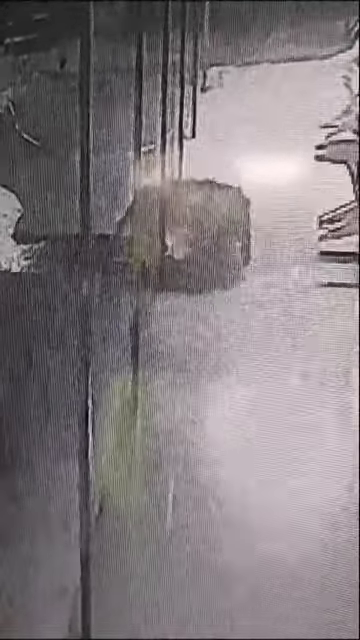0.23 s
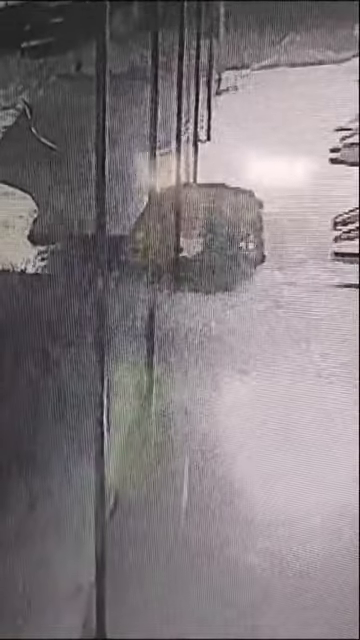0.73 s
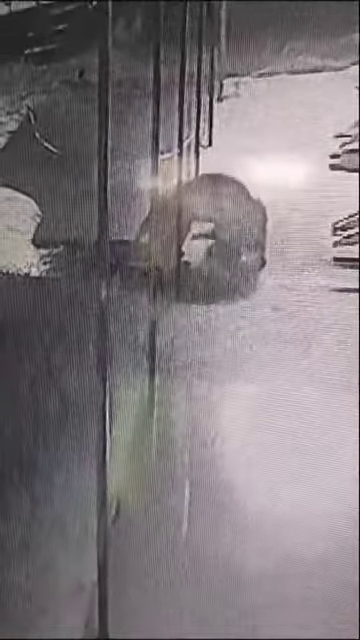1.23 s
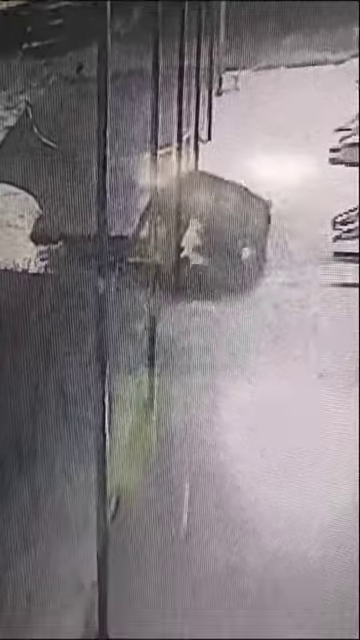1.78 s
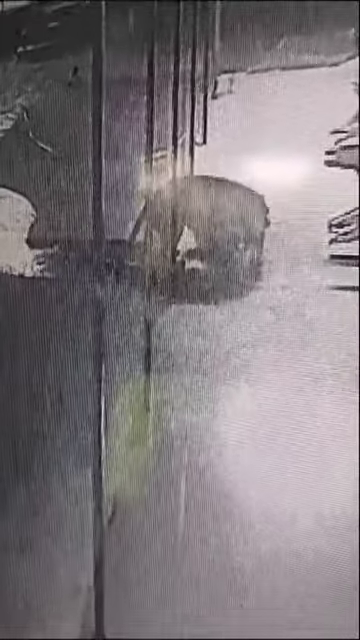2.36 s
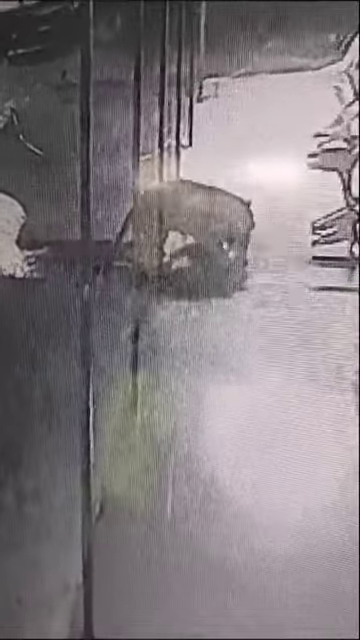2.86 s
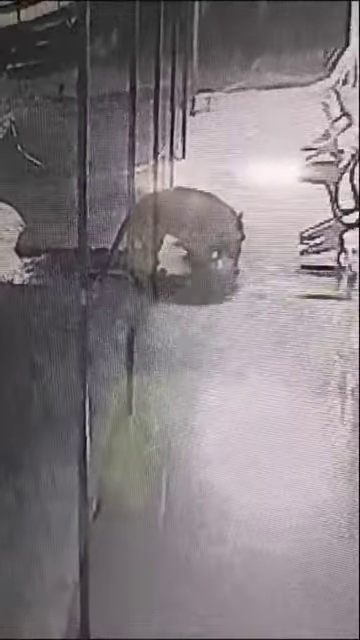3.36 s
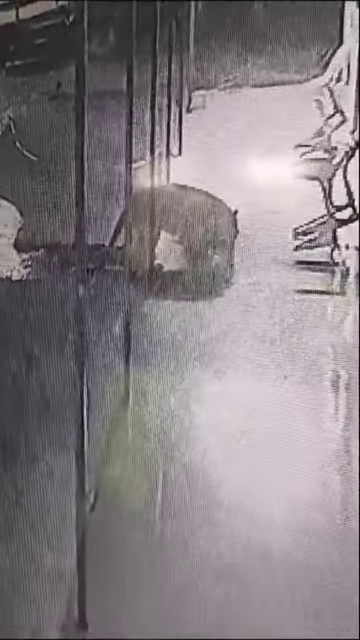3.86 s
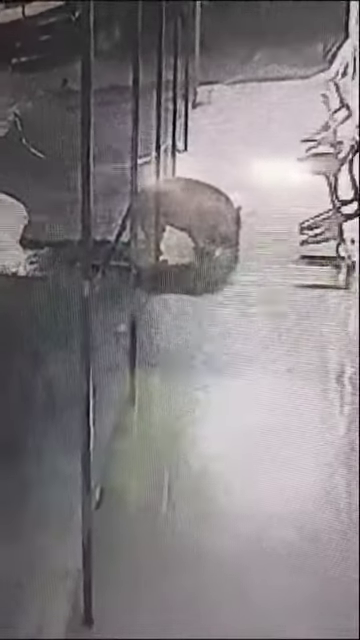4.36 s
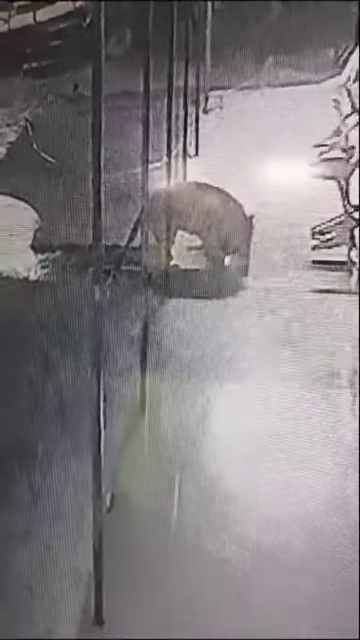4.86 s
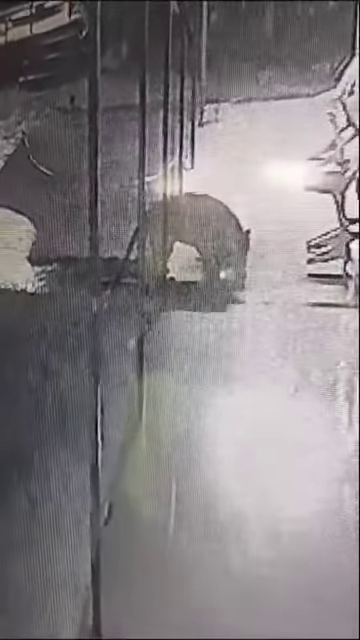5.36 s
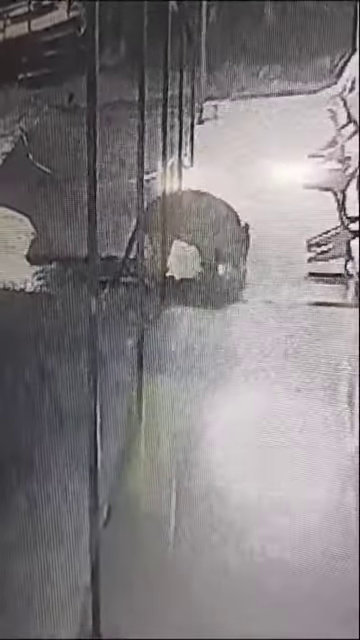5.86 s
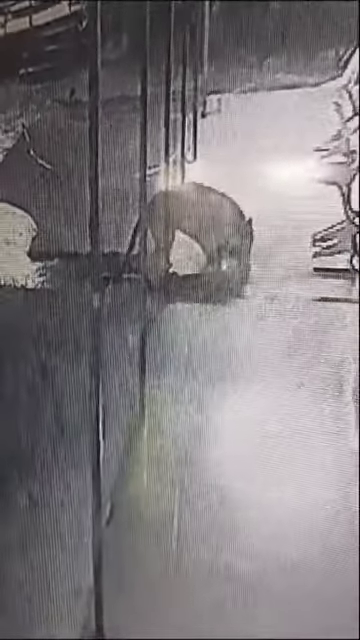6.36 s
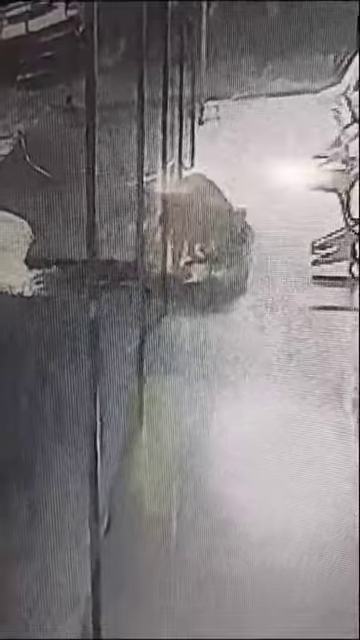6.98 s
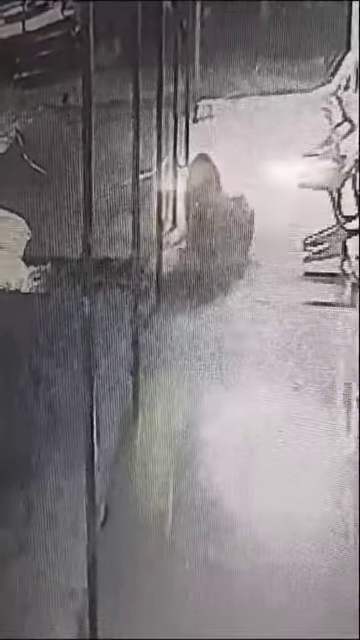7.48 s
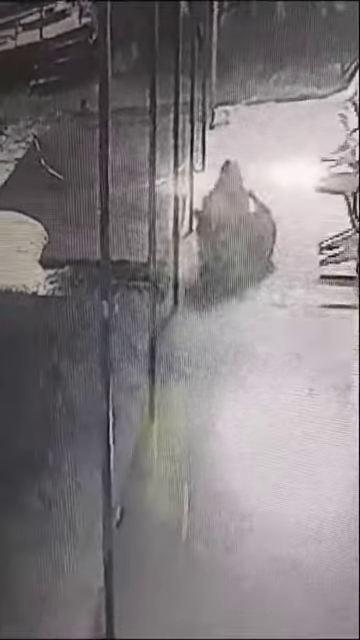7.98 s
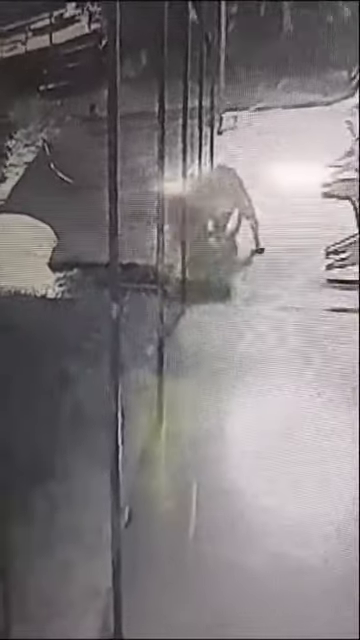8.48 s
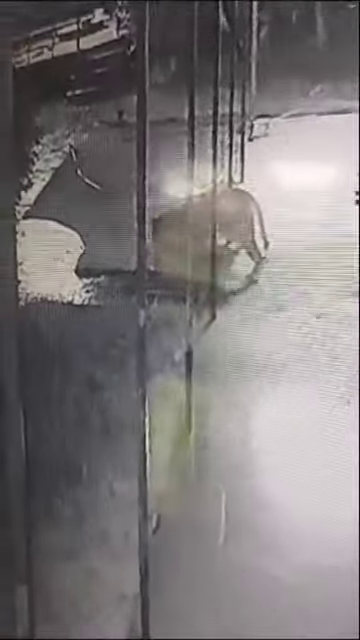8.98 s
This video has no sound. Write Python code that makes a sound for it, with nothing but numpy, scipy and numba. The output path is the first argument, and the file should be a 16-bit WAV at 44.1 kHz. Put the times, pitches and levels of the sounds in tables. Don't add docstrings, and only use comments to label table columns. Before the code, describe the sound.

Night scenes joined by quick fades. First a large cat's wet snarls and short heavy rumble, full and near. Next a leopard's rasping in-and-out breathing, like sawing wood, slowing into a low pulsing growl, with tiny bird whistles behind. Last, dull narrow-band hum and hiss with a dog giving two sharp yelps, the first squeal falling, the second rising, both distorted, with a short wall echo.

```python
import sys
import numpy as np
from scipy import signal
from scipy.fft import rfft, irfft
from scipy.io import wavfile
from scipy.ndimage import uniform_filter1d
from numba import njit

SR = 44100
rng = np.random.default_rng(int(sys.argv[2]) if len(sys.argv) > 2 else 0)


def boost(x):
    u = np.asarray(x, float) / 20
    return 10 ** u


def pcm_store(signal):
    levels = np.round(np.clip(np.atleast_2d(signal), -1, 1) * 32767)
    wavfile.write(sys.argv[1], SR, levels.astype(np.int16).T)


N = 407043
T = np.arange(N) / SR


def unit(x):
    return x / np.sqrt(np.mean(x ** 2))


def noise():
    return rng.standard_normal(N)


def curves(*tables):
    rows = np.vstack(tables)
    gate = sum((T >= t[0][0]) & (T < t[-1][0]) for t in tables) > 0
    columns = [np.interp(T, rows[:, 0], column) for column in rows.T[1:]]
    return uniform_filter1d(1. * gate, size=150), columns


@njit
def svf(x, hz, width_hz):
    y, band, low = np.empty(len(x)), 0., 0.
    for i in range(len(x)):
        g = np.tan(np.pi * hz[i] / SR)
        k = width_hz / hz[i]
        v = (band + g * (x[i] - low)) / (1 + g * (g + k))
        band = 2 * v - band
        low += 2 * g * v
        y[i] = k * v
    return y


def ring(x, hz, width_hz):
    return svf(x, hz + 0 * T, 1. * width_hz) * np.sqrt(SR / (np.pi * width_hz))


def flicker(db, hz):
    return boost(db * unit(ring(noise(), hz, 2 * hz)))


@njit
def flaps(hz, jitter, chance, size, puff_s):
    click, puff = np.zeros(len(hz) + 1), np.empty(len(hz))
    phase, cycle, air = 0., 0, 0.
    fall = np.exp(-1 / (puff_s * SR))
    for i in range(len(hz)):
        step = hz[i] * np.exp(jitter[i] * chance[cycle]) / SR
        phase += step
        air *= fall
        if phase >= 1:
            phase -= 1
            cycle += 1
            height = size[cycle] * np.sqrt(SR / hz[i])
            click[i] += height * phase / step
            click[i + 1] += height * (1 - phase / step)
            air = height * np.sqrt(2 / (puff_s * SR))
        puff[i] = air
    return click[:-1], puff


def voice(hz, jitter, breath, scatter_db, puff_s):
    chance = rng.standard_normal((8000, 2)).T
    click, puff = flaps(hz, jitter + 0 * T, chance[0], boost(scatter_db * chance[1]), puff_s)
    return click, np.sqrt(1 - breath) * puff * noise() + np.sqrt(breath) * noise()


def tract(x, modes, gust_db, stretch=1):
    power = np.array([width * boost(db) ** 2 for _, width, db in modes])
    share = np.sqrt(power / power.sum())
    gusts = flicker(gust_db, 20)
    out = np.zeros(N)
    for k, (hz, width_hz, _) in enumerate(modes):
        centre_hz = hz * stretch if hz < 3000 else hz
        out += (-1) ** k * share[k] * ring(x * np.roll(gusts, k * SR), centre_hz, width_hz)
    return out


def colour(x, points):
    hz, db = np.transpose(points)
    grid = np.maximum(np.fft.rfftfreq(4096, 1 / SR), 1)
    cep = irfft(np.interp(np.log(grid), np.log(hz), db) * np.log(10) / 20)
    cep[1:2048] *= 2
    cep[2049:] = 0
    h = irfft(np.exp(rfft(cep)))
    return signal.fftconvolve(x, h / np.sqrt(np.sum(h ** 2)))[:N]


def echo(x, t60_s):
    h = rng.standard_normal(SR // 2) * 10 ** (-3 * T[:SR // 2] / t60_s)
    return signal.fftconvolve(x, h / np.sqrt(np.sum(h ** 2)))[:N]


def whistles(rows):
    out = np.zeros(N)
    for start_s, length_s, start_hz, middle_hz, end_hz, level_db in rows:
        u = np.linspace(0, 1, int(length_s * SR))
        hz = np.polyval(np.polyfit([0, .5, 1], [start_hz, middle_hz, end_hz], 2), u)
        tone = np.sqrt(np.sin(np.pi * u)) * np.sin(2 * np.pi * np.cumsum(hz) / SR)
        out[int(start_s * SR):][:len(u)] += boost(level_db) * tone
    return out


# time_s, rumble_db, throat_db, mouth_db, hiss_db
ROAR = [
    [(0.0, -24, -15.5, -10, -22.5), (0.118, -36, -13.5, -15, -27), (0.2, -26, -7.5, -18, -27.5)],
    [(0.2, -7.5, -14, -16, -27.5), (0.46, -15.5, -19, -21.5, -30), (0.5, -20, -18.5, -34, -45.5)],
    [(0.5, -19.5, -19.5, -30.5, -39), (0.608, -11, -16.5, -18.5, -25.5), (0.8, -20.5, -17, -21.5, -29.5)],
    [(0.8, -38, -20.5, -20.5, -28.5), (1.006, -43, -25, -25.5, -32), (1.068, -45, -25.5, -25.5, -31),
     (1.17, -45, -24.5, -41, -53)],
    [(1.17, -44, -36.5, -35, -64.5), (1.228, -46, -22.5, -27.5, -30.5), (1.35, -33, -29, -34, -30.5),
     (1.526, -56, -33.5, -41, -38.5), (1.73, -72, -56, -71, -69.5)],
]
# freq_hz, density_db_per_hz
ROAR_THROAT = [(35, -37.5), (60, -11), (96, 2.5), (151, -9), (199, -5), (246, -11.5), (350, -16),
               (400, -20), (520, -19), (880, -120)]
# time_s, pitch_hz, level_db
MOAN = [(.57, 204, -38.5), (.65, 203.7, -20), (.9, 202, -24.5), (1.03, 168.7, -26.5), (1.08, 165, -48.5)]
# (freq_hz, density_db_per_hz)
SNARLS = [
    (0, 33.9, 0.86, [(374, 53, 0), (870, 87, -5.5), (1386, 110, -13), (1803, 33, -13), (2260, 230, -19.5)], [(1180, -55), (2000, 7), (2650, 10), (3050, 4), (3810, 8), (4600, -4), (7060, 1), (13400, -8), (15600, -17.5)]),
    (.52, 190.2, 0.41, [(637, 20, -3.5), (926, 71, -6), (1644, 64, -11)], [(1180, -45), (2000, 5.5), (2310, -1.5), (3550, -8.5), (4180, -3), (5550, -11.5), (6940, -6), (11200, -8), (15600, -19)]),
    (1.18, 60.05, .9, [(670, 95, -10.5), (954, 27, -4.5), (1270, 39, -15), (1520, 76, -18)], [(1180, -24), (2000, -8), (2970, -9), (4080, -5.5), (6430, -17), (7440, -4.5), (8910, -17), (13800, -20), (15600, -36.5)]),
]


def roar():
    gate, (rumble_db, throat_db, mouth_db, hiss_db) = curves(*ROAR)
    rumble_hz = 45 * (1 + 0.096 * unit(ring(noise(), 12, 16)))
    phase = 2 * np.pi * np.cumsum(rumble_hz) / SR
    rumble = boost(rumble_db) * np.sqrt(2) * (np.sin(phase) + 0.29 * np.sin(2 * phase + 1.2))
    snarl = boost(throat_db) * colour(noise(), ROAR_THROAT)

    on, (moan_hz, moan_db) = curves(MOAN)
    moan = on * boost(moan_db) * noise()
    snarl += ring(moan, moan_hz, 11) + 0.55 * ring(moan, 1.563 * moan_hz, 8.4)

    ends_s = [row[0] for row in SNARLS[1:]] + [T[-1]]
    for (start_s, flap_hz, breath, modes, hiss), end_s in zip(SNARLS, ends_s):
        click, air = voice(flap_hz + 0 * T, .06, breath, scatter_db=0.98, puff_s=0.0087)
        on = (T >= start_s) & (T < end_s)
        snarl += tract(on * boost(mouth_db) * (air + .3 * click), modes, 1.5)
        snarl += colour(on * boost(hiss_db) * air, hiss)
    return gate * rumble, gate * snarl


# time_s, peak_db
SPITS = [(0.1246, -9), (0.1774, -15.5), (0.1984, -7), (0.2234, -8), (0.2498, -9), (0.2774, -26),
         (0.3022, -10), (0.3844, -9), (0.4125, -12), (0.4499, -11), (1.1997, -18), (1.2214, -16),
         (6.1554, -28)]


def spits():
    hits = np.zeros(N)
    for time_s, peak_db in SPITS:
        hits[int(time_s * SR)] = boost(peak_db)
    decay = signal.lfilter([1], [1, -np.exp(-1 / (0.0068 * SR))], hits)
    wheeze = boost(-23.5) * np.exp(-((T - .6) / .025) ** 2) * ring(noise(), 6750, 200)
    return wheeze + ring(decay * noise() * .5, 6500, 7000)


# freq_hz, density_db_per_hz
BUSH = [(18, -57.5), (30, 6.5), (400, -10), (432, -28), (493, -13), (711, -11.5), (1020, -14), (2490, -25),
        (3070, -27), (15600, -26)]
# time_s, gain_0_1
BUSH_FADE = [(1.73, 0.1), (1.9, 0.33), (2.3, 0.67), (6.0, 0.96), (6.63, 0.13)]
# start_s, length_s, start_hz, middle_hz, end_hz, level_db
BIRDS = [(2.365, 0.21, 4400, 4000, 3350, -49), (2.795, 0.07, 4670, 3900, 3250, -52),
         (4.665, 0.045, 4380, 4650, 4640, -51), (4.73, 0.063, 4430, 4050, 3550, -56),
         (5.245, 0.049, 2500, 3300, 4050, -39), (5.297, 0.032, 3750, 3730, 4160, -32),
         (5.34, 0.016, 3940, 3260, 2950, -53), (5.85, 0.083, 4820, 4860, 4950, -58),
         (6.25, .055, 4100, 4650, 4930, -56), (6.31, 0.13, 4300, 4130, 3660, -59),
         (5.12, 0.22, 5400, 5520, 5700, -64), (6.1, 0.16, 5300, 5520, 5660, -53.5),
         (6.11, 0.056, 1850, 1920, 1900, -42)]


def bush():
    birds = whistles(BIRDS)
    air = np.interp(T, *np.transpose(BUSH_FADE), 0, 0) * boost(-44.5) * colour(noise(), BUSH)
    return air + birds + 0.54 * echo(birds, 0.087)


def lows(throat, mouth, throat_hz, mouth_hz, chest_db):
    chest = svf(ring(throat, 96, 54), 70 + 0 * T, 98.0)
    throat = svf(ring(throat, throat_hz, 24), throat_hz + 0 * T, 160.)
    throat = svf(throat, .8 * throat_hz + 0 * T, 200.)
    mouth = svf(ring(mouth, mouth_hz, 33.2), 1.32 * mouth_hz + 0 * T, 640.0)
    return boost(chest_db) * chest + throat + mouth


# time_s, throat_db, mouth_db (above throat), rasp_db (above throat)
SAW = [
    [(1.745, -31.5, -5, -19), (1.937, -21.5, -4.5, -20.5), (2.04, -55.5, -44, -13.5)],
    [(2.43, -21.5, -9, -17), (2.468, -6.5, -8.5, -19.5), (2.6, -10.5, 0, -19)],
    [(2.6, -6, -10.5, -16), (2.742, -14.5, -11.5, -26), (2.8, -45.5, -34, -8.5)],
    [(3.245, -23, -2, -18.5), (3.273, -5, -7.5, -19.5), (3.43, -10.5, -11, -21)],
    [(3.43, -7, -8, -17.5), (3.608, -25, -23, -28), (3.66, -61, -9, -22)],
    [(4.115, -25.5, -10, -24), (4.149, -5, -11, -24.5), (4.3, -8, -8, -19.5)],
    [(4.3, -6, -8.5, -19.5), (4.464, -20, -11.5, -21), (4.53, -46, -27, -17)],
    [(5.32, -26.5, -9, -12.5), (5.39, -10.5, -10, -21), (5.5, -11.5, -12, -12)],
    [(5.5, -7, -13, -15), (5.508, -13, -11, -16), (5.6, -10, -11.5, -19), (5.612, -13, -9.5, -13),
     (5.864, -17.5, -27, -18), (6.15, -24, -19, -13), (6.496, -33, -32.5, -23.5), (6.63, -58.5, -17, -14)],
]
# time_s, flap_hz, breath_share_0_1, throat_hz, mouth_hz, stretch (ratio)
FOLDS = [(1.745, 60, .5, 215, 640, 1), (1.86, 55, .5, 195, 680, 1), (2.04, 36, .3, 140, 610, 1),
         (2.44, 55, .5, 185, 640, 1), (2.51, 67, .5, 212, 700, 1), (2.61, 62, .5, 195, 625, 1),
         (2.63, 56, .5, 188, 710, 1), (2.8, 33, .3, 140, 540, 1), (3.25, 55, .5, 185, 640, 1),
         (3.36, 64, .5, 205, 610, 1), (3.44, 58, .5, 190, 690, 1), (3.66, 33, .3, 135, 540, 1),
         (4.12, 57, .5, 195, 660, 1), (4.25, 61, .5, 215, 610, 1), (4.33, 55, .5, 200, 700, 1),
         (4.53, 33, .3, 130, 540, 1), (5.32, 43, .4, 185, 640, .97), (5.5, 44.4, .3, 185, 680, .97),
         (5.76, 42.5, .2, 152, 580, .98), (5.8, 41.5, .15, 145, 790, .99), (5.98, 37.6, .1, 124, 800, 1),
         (6.14, 36.3, .1, 120, 830, 1.02), (6.35, 36, .1, 130, 880, 1.08), (6.63, 37.5, .1, 175, 950, 1.18)]
# freq_hz, width_hz, level_db
OUT = [(970, 35, 0.5), (1707, 73, -0.5), (2036, 140, -8), (3070, 87, -5.5), (3680, 210, -24.5),
       (4500, 120, -35), (5370, 330, -15.5)]
# freq_hz, width_hz, level_db
GROWL = [(1310, 60, -6), (1690, 70, 0), (2130, 170, -3), (2530, 90, -6), (2950, 200, -6), (3630, 150, 4),
         (4200, 120, -14), (5000, 200, -18)]
# freq_hz, density_db_per_hz
RASP = [(470, -19.5), (800, -11), (1450, -2.5), (1660, 8.5), (2670, -22), (3590, 3), (5910, -18),
        (15600, -30.5)]


def saw_out():
    growl_s = 5.3
    gate, (throat_db, mouth_db, rasp_db) = curves(*SAW)
    _, (flap_hz, breath, throat_hz, mouth_hz, stretch) = curves(FOLDS)
    click, air = voice(flap_hz, breath / 16, breath, scatter_db=1., puff_s=.006)
    low = gate * boost(throat_db) * (click + .55 * np.sqrt(breath) * air)
    mouth = gate * boost(throat_db + mouth_db) * (.75 * click + np.sqrt(breath) * air)
    high = gate * boost(throat_db + rasp_db) * ((1 - breath) ** 2 * click + air)
    upper = tract((T < growl_s) * high, OUT, 4, (throat_hz / 195) ** .3)
    upper += tract((T >= growl_s) * high, GROWL, 2, stretch)
    rasp = colour(high * flicker(3.5, 30), RASP)
    return lows(low, mouth, throat_hz, mouth_hz, chest_db=-14) + .8 * upper + .6 * rasp


# time_s, rasp_db
DRAW = [
    [(2.12, -57), (2.186, -37.5), (2.41, -41.5)],
    [(2.9, -55), (2.97, -35), (3.23, -41)],
    [(3.79, -51), (3.846, -33), (4.09, -44)],
    [(4.79, -51.5), (4.978, -49), (5.26, -53)],
]
# time_s, peak_db, mouth_db (above peak), rasp_db (above peak)
RATTLE = [(2.086, -27.5, -27, -20.5), (2.163, -17.5, -7, -25.5), (2.2, -20.5, -23, -26),
          (2.236, -12.5, -28, -44.5), (2.269, -14, -17, -21.5), (2.299, -9, -28, -13),
          (2.346, -8, -22, -18.5), (2.374, -13, -10, -21), (2.865, -25, -28, -29),
          (2.945, -17.5, -8.5, -20), (2.989, -17, -11.5, -30.5), (3.011, -19, -27, -37.5),
          (3.053, -12.5, -24, -56), (3.101, -10, -15, -26), (3.149, -5, -12, -28.5),
          (3.179, -15.5, -9, -9.5), (3.804, -20.5, -7, -20.5), (3.831, -20, -33, -49),
          (3.884, -25, -17, -33), (3.91, -22.5, -24, -2.5), (3.926, -11, -23, -36), (3.964, -13, -8.5, -25),
          (3.999, -7, -21, -19), (4.039, -9.5, -11, -12.5), (4.811, -18.5, -16, -18),
          (4.896, -22.5, -25, -9), (4.967, -16.5, -13.5, -18), (5.038, -15.5, -32, -28),
          (5.092, -21.5, -28, -17), (5.186, -17.5, -25, -34)]
# freq_hz, width_hz, level_db
IN = [(1852, 38, 6), (2264, 120, 14), (2590, 64, 9.5), (2970, 45, -17), (3750, 190, -22), (5194, 40, 6.5)]


def saw_in():
    gate, (rasp_db,) = curves(*DRAW)
    slaps = np.zeros((3, N))
    for time_s, peak_db, mouth_db, high_db in RATTLE:
        slaps[:, int(time_s * SR)] = boost(peak_db + np.array([0, mouth_db, high_db]))
    puffs = signal.lfilter([1], [1, -np.exp(-1 / (.009 * SR))], slaps) * noise()
    high = gate * boost(rasp_db) * flicker(5.4, 25) * noise() + 1.85 * puffs[2]
    murmur = gate * boost(rasp_db + 18) * noise()
    throat = 22 * slaps[0] + .25 * puffs[0] + murmur
    mouth = 14 * slaps[1] + .5 * puffs[1] + 0.18 * murmur
    low = lows(throat, mouth, throat_hz=158, mouth_hz=605, chest_db=-6.5)
    return low + 0.26 * tract(high, IN, 4.7) + 0.29 * colour(high, RASP)


def patchy(x, edge_hz, lost):
    hz, frame_s, z = signal.stft(x, SR, nperseg=1024)
    keep = rng.random((33, len(frame_s) // 2 + 1)) > lost
    keep = np.kron(keep, np.ones((16, 2)))[:len(hz), :len(frame_s)]
    return signal.istft(z * np.where(hz[:, None] > edge_hz, keep, 1), SR, nperseg=1024)[1][:N]


# freq_hz, density_db_per_hz
YARD = [(15, -44.5), (25, -22), (59, -4), (127, -16), (162, -1.5), (191, -11.5), (237, -12), (301, -15),
        (452, -18), (971, -27.5), (6580, -34.5), (7600, -50), (9880, -76), (16700, -120)]
# freq_hz, level_db
HUM = [(59.2, -55.5), (118.4, -37.5), (156.1, -44.5)]
# time_s, gain_0_1
YARD_FADE = [(6.64, 0), (6.8, 0.29), (7.2, 0.89), (8.8, 0.8), (9.23, 0.82)]


def yard():
    hum = sum(boost(db) * np.sqrt(2) * ring(noise(), hz, 2.5) * 0.42 for hz, db in HUM)
    hiss = boost(-35) * colour(noise(), YARD + [(7800, -110)])
    return np.interp(T, *np.transpose(YARD_FADE)) * (hiss + hum)


# start_s, length_s, start_hz, middle_hz, end_hz, level_db
WHIMPERS = [
    (7.06, 0.051, 263, 281.5, 285, -25),
    (8.705, .045, 595, 634, 716, -28),
]
# time_s, level_db, second_db (second resonance above first), first_hz
YELPS = [
    [(7.11, -46, -18, 1600), (7.125, -12.5, -36, 1500), (7.14, -17, -25, 1250), (7.155, -29.5, -14.5, 1540),
     (7.195, -14, -17.5, 1530), (7.25, -8.5, -4, 1390), (7.28, -6, -6, 1287), (7.31, -19.5, 3.5, 1170),
     (7.35, -26.5, 3.5, 1210), (7.41, -35, -0.5, 1350), (7.43, -22.5, -15, 1380), (7.49, -30.5, -17, 1400),
     (7.57, -46, -5, 1380)],
    [(8.457, -31, -21, 1250), (8.47, -12.5, -14.5, 1240), (8.495, -7, 2, 1236), (8.52, -26.5, 0, 1290),
     (8.55, -25, 6.5, 1200), (8.62, -38, 1.5, 1250), (8.635, -20, -10, 1340), (8.69, -12, -41, 1300),
     (8.717, -21, -33, 1360), (8.75, -27, -23, 1390), (8.8, -27, -20, 1290), (8.89, -50, -5, 1380)],
]
# time_s, pitch_hz, breath_share_0_1
DOG = [(7.1, 400, .9), (7.6, 400, .9), (8.45, 280, .6), (8.6, 300, .8), (8.63, 215, .25), (8.717, 240, .15),
       (8.722, 650, .1), (8.75, 690, .1), (8.76, 300, .8), (8.9, 300, .9)]
# time_s, pitch_hz, level_db
SQUEALS = [
    [(7.203, 1459, -18.5), (7.216, 1345, -3.5), (7.225, 1343, -21.5), (7.235, 1270, 0), (7.258, 1207, -3.5),
     (7.29, 975.4, -22)],
    [(8.488, 1070, -20), (8.5, 1134, -4.5), (8.513, 1312, 1), (8.518, 1340, -19.5)],
]


def dog():
    gate, (level_db, second_db, first_hz) = curves(*YELPS)
    _, (pitch_hz, breath) = curves(DOG)
    click, air = voice(pitch_hz, 0.0091, 0.95, scatter_db=1.2, puff_s=.002)
    source = gate * boost(level_db) * (np.sqrt(1 - breath) * click + np.sqrt(breath) * air)
    hoarse = svf(ring(source, first_hz, 200), first_hz, 490.0)
    hoarse += svf(ring(source * boost(second_db), 2350, 310), 2350 + 0 * T, 600.0)
    on, (squeal_hz, squeal_db) = curves(*SQUEALS)
    phase = 2 * np.pi * np.cumsum(squeal_hz) / SR
    squeal = on * boost(squeal_db + 4.0) * (np.sin(phase) + .12 * np.sin(2 * phase))
    direct = 0.77 * hoarse + squeal + whistles(WHIMPERS)
    return direct + boost(-18) * echo(direct, .2)


def camera(x):
    return np.clip(x, -1, 1)


def scene():
    rumble, snarl = roar()
    near = snarl + spits()
    leopard = saw_out() + saw_in()
    far = leopard + boost(-17) * echo(leopard, .15) + bush()
    top = signal.sosfilt(signal.butter(4, 6000, "high", fs=SR, output="sos"), far)
    near_side = boost(-7) * echo(svf(near + .3 * rumble, 400 + 0 * T, 9000.), 0.087)
    far_side = boost(-23.5) * echo(far, 0.017) + boost(-4.5) * echo(top, 0.026)
    side = near_side + patchy(far_side, 9100, 0.46)
    middle = rumble + near + patchy(far, 8770, .5) + camera(yard() + dog())
    return middle + side * np.array([[1], [-1]])


def low_pass(x):
    return signal.sosfilt(signal.butter(12, 15710, fs=SR, output="sos"), x)


def record(dry):
    mix = np.clip(dry, -1, 1)
    return low_pass(mix)


dry = scene()
out = record(dry)
pcm_store(out)
```